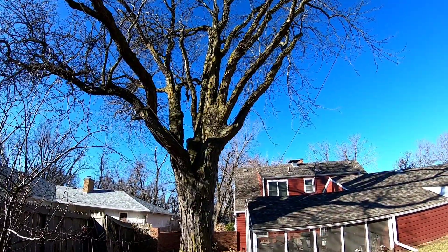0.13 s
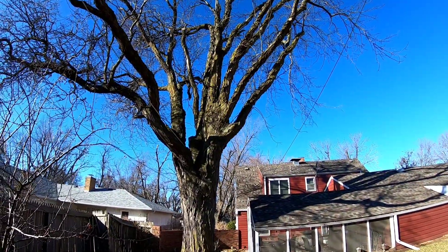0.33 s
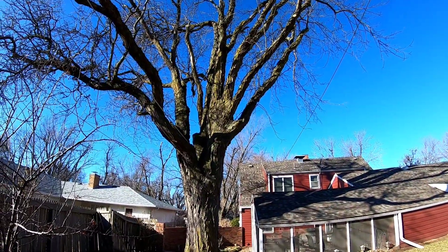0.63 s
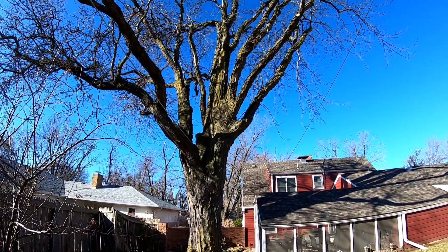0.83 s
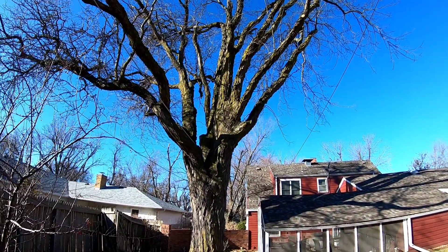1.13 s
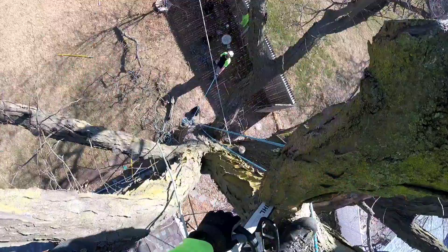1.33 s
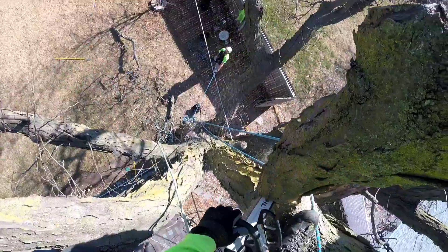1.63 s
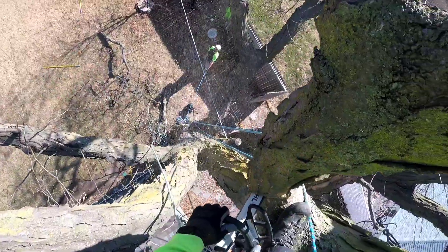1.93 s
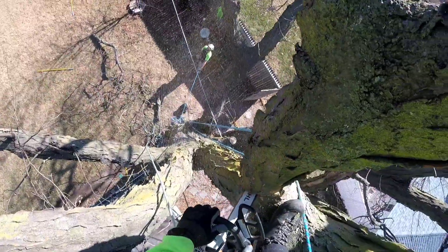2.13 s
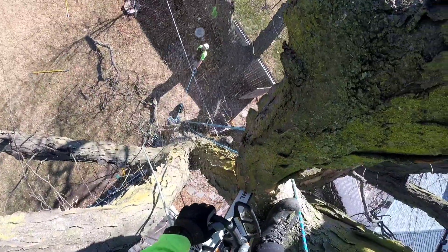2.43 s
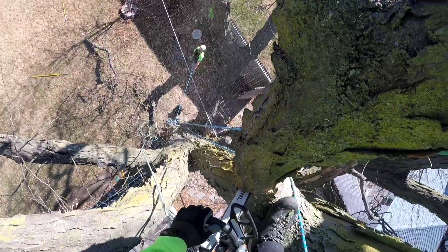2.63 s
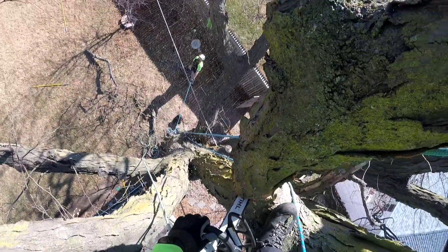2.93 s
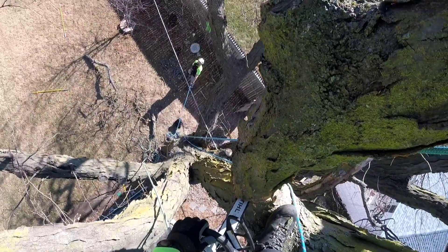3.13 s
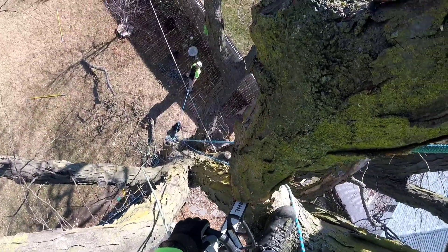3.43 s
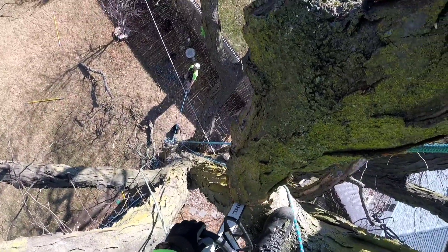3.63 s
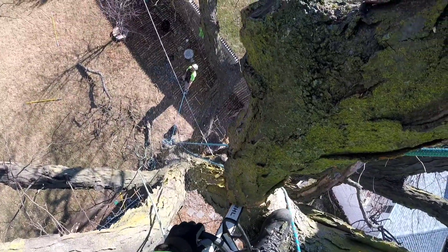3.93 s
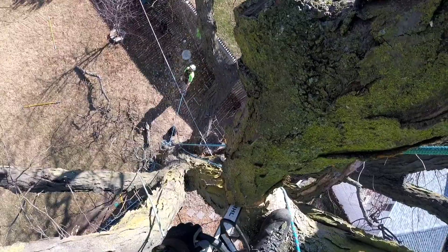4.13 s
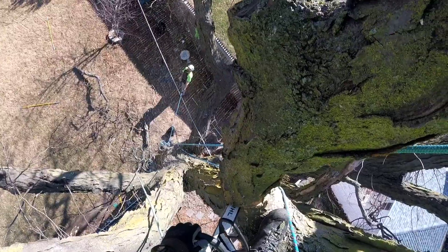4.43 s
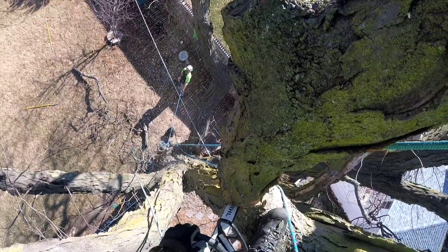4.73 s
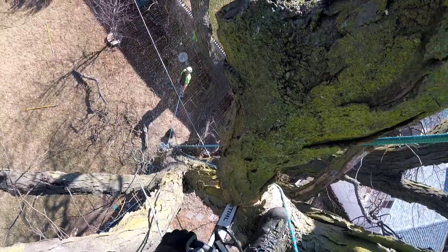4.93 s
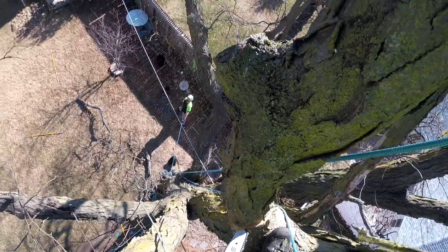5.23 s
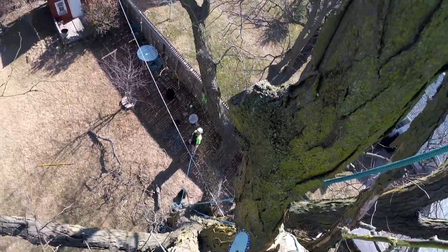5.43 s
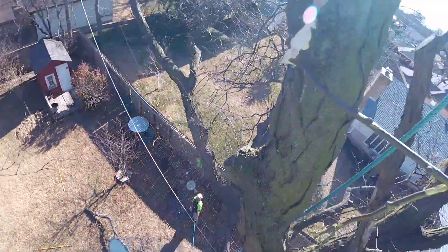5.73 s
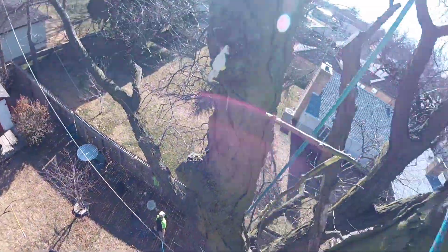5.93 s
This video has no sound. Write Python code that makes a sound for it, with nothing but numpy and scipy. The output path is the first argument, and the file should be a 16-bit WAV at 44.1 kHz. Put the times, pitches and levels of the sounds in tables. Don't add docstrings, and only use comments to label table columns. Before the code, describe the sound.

A hand rubs and snaps a camera button in a quiet yard, then a close chainsaw revs in bursts, idles lumpily and stops in wind.

```python
import sys
import numpy as np
from scipy import signal
from scipy.fft import rfft, irfft, next_fast_len
from scipy.io import wavfile
from scipy.ndimage import uniform_filter1d, map_coordinates

SR = 44100
rng = np.random.default_rng(int(sys.argv[2]) if len(sys.argv) > 2 else 0)


def volts_from_db(level):
    exponent = np.asarray(level, float) / 20
    return 10 ** exponent


def unload_audio(sound):
    columns = np.transpose(np.atleast_2d(sound))
    steps = np.round(np.clip(columns, -1, 1) * 32767)
    wavfile.write(sys.argv[1], SR, steps.astype(np.int16))


N = 267598
T = np.arange(N) / SR
CUT_S = 1.33


def unit(x):
    return x / np.sqrt(np.mean(x ** 2) + 1e-20)


def level(x, span_s=0.052):
    size = round(span_s * SR)
    power = uniform_filter1d(uniform_filter1d(x ** 2, size=size), size=size)
    return x / np.sqrt(np.abs(power) + 1e-12)


def curves(rows):
    s, *columns = np.transpose(rows)
    return [np.interp(T, s, column, -120, -120) for column in columns]


def lagged(x, lag_s):
    return uniform_filter1d(x, size=round(lag_s * SR))


def wobble(rate_hz):
    knots = rng.standard_normal(int(N * rate_hz / SR) + 4)
    return map_coordinates(knots, [np.arange(N) * rate_hz / SR])


def coloured(x, spectrum):
    m = next_fast_len(N + 8192) // 2 * 2
    hz, db = np.transpose(spectrum)
    curve_db = np.interp(np.log(np.fft.rfftfreq(m, 1 / SR) + 1), np.log(hz + 1), db)
    cepstrum = irfft(np.log(volts_from_db(curve_db) + 1e-6), m)
    cepstrum[1:m // 2] *= 2
    cepstrum[m // 2 + 1:] = 0
    return irfft(rfft(x, m) * np.exp(rfft(cepstrum)), m)[..., :N]


def resonant(x, hz, width_hz):
    return signal.lfilter(*signal.iirpeak(hz, hz / width_hz, SR), x)


def noise(spectrum, channels=1):
    return unit(coloured(rng.standard_normal((channels, N)), spectrum))


def puffs(impulses, decay_s):
    return signal.lfilter([1], [1, -np.exp(-1 / (decay_s * SR))], impulses)


def after(times_s, sizes, decay_s):
    marks = np.bincount(np.round(np.asarray(times_s) * SR).astype(int), sizes, N + SR)[:N]
    return puffs(marks, decay_s)


def beats(turns, offset, scatter_db, jitter):
    count = int(turns[-1])
    chance = rng.standard_normal((count, 2))

    def place(turn):
        return np.minimum(np.interp(turn, turns, np.arange(N) * 1.), N - 2)

    due = place(np.arange(count) + offset).astype(int)
    at = place(np.arange(count) + offset + (jitter * np.ones(N))[due] * chance[:, 0])
    size = volts_from_db((scatter_db * np.ones(N))[due] * chance[:, 1])
    whole = at.astype(int)
    part = at - whole
    return np.bincount(whole, size * (1 - part), N) + np.bincount(whole + 1, size * part, N)


# time in seconds, far traffic in dB, air in dB.
YARD_LEVELS = [
    (0.0, -53.5, -65),
    (0.138, -51, -68),
    (0.352, -51.5, -61),
    (0.51, -51, -58),
    (0.866, -50, -54.5),
    (0.996, -47.5, -49),
    (1.198, -52, -57.5),
    (1.32, -62, -83),
]
# frequency in Hz, level in dB per Hz.
TRAFFIC_SPECTRUM = [(18, -45), (30, -12), (62, -8.5), (113, -14), (194, -8), (327, -16), (405, -8.5),
                    (432, -14.5), (651, -17), (1500, -33), (1950, -53), (3300, -120)]
# frequency in Hz, level in dB per Hz.
AIR_SPECTRUM = [(590, -51), (1000, -6), (2090, -8.5), (2350, -13), (2630, -16), (2800, -17), (12000, -34),
                (15600, -71), (22000, -120)]


def yard():
    traffic_db, air_db = curves(YARD_LEVELS)
    traffic = noise(TRAFFIC_SPECTRUM) + .5 * noise(TRAFFIC_SPECTRUM, channels=2)
    air = noise(AIR_SPECTRUM, channels=2)
    return volts_from_db(traffic_db + .9 * wobble(9.1)) * traffic + volts_from_db(air_db + wobble(4.7)) * air


# start in seconds, pitch in Hz, length in seconds, level in dB.
BIRD_NOTES = [
    (.31, 2120, .03, -61),
    (.36, 2580, 0.13, -64),
    (.46, 2200, .06, -59),
    (0.534, 2140, 0.052, -58),
    (.6, 2100, .05, -63),
]


def bird():
    waver = np.cumsum(90 * wobble(60)) / SR
    song = np.zeros(N)
    for s, hz, length_s, db in BIRD_NOTES:
        swell = np.sin(np.pi * np.clip((T - s) / length_s, 0, 1))
        song += volts_from_db(db) * swell * np.sin(2 * np.pi * (hz * T + waver))
    return song


# time in seconds, level in dB, left minus right in dB.
SLIDE_LEVELS = [
    (0.8, -81, 0.5),
    (0.82, -34, -1),
    (0.898, -30, 1),
    (0.964, -50.5, -1),
    (1.0, -25, 0),
    (1.02, -21.5, -0.5),
    (1.046, -41.5, -3),
    (1.12, -70, 1.0),
]
# frequency in Hz, level in dB per Hz.
HOUSING_SPECTRUM = [(350, -42), (600, -23), (1020, -21), (1240, -9.5), (1590, -4.5), (1970, -17.5),
                    (3410, -11.5), (4080, -18), (5000, -9.5), (6230, -20.5), (8300, -13.5), (9140, -26),
                    (10100, -27), (11200, -45), (15800, -48)]


def hand_slide():
    db, pan_db = curves(SLIDE_LEVELS)
    rub = noise(HOUSING_SPECTRUM) + 1.7 * noise(HOUSING_SPECTRUM, channels=2)
    rub *= volts_from_db(db - 6.5 + wobble(150))
    rub += volts_from_db(db - 7) * unit(resonant(rng.standard_normal((2, N)), 1600, 110))
    return rub * volts_from_db(np.array([pan_db, -pan_db]) / 2 * (db > -100))


# frequency in Hz, level in dB per Hz.
BUFFET_SPECTRUM = [(15, -22), (28, 7.5), (50, 2.5), (65, 10.5), (200, -56), (600, -120)]
# frequency in Hz, level in dB per Hz.
FLUTTER_SPECTRUM = [(40, -3.5), (65, -3), (130, -1.5), (220, -13.5), (450, -32), (1500, -50.5),
                    (4000, -120)]


def buffeting(rows, sides, lumpy_db):
    buffet, flutter = (uniform_filter1d(volts_from_db(db), size=400) for db in curves(rows))
    low = volts_from_db(2.67 * lumpy_db * wobble(14)) * level(noise(BUFFET_SPECTRUM, channels=sides), 0.11)
    high = volts_from_db((1.5 + 1.5 * lumpy_db) * wobble(25)) * level(noise(FLUTTER_SPECTRUM, channels=sides))
    return buffet * low + flutter * high


# time in seconds, buffet in dB, flutter in dB.
SQUEEZE_LEVELS = [
    (0.8, -56, -54),
    (0.856, -41, -29.5),
    (0.976, -65, -41.5),
    (1.028, -18, -28),
    (1.07, -36, -40.5),
    (1.186, -28, -23.5),
    (1.224, -34, -65),
    (1.25, -26, -19),
]


def hand_pressure():
    return buffeting(SQUEEZE_LEVELS, sides=2, lumpy_db=0)


# time in seconds, peak in dB, ring in Hz, push minus peak in dB, snap share 0-1.
BUTTON_HITS = [
    (1.179, -34, 1560, 2, 0.35),
    (1.2420, -31, 3500, -4, 0.83),
    (1.253, -28, 3280, 11, 0.9),
    (1.2628, 3.5, 1400, -5, 0.93),
    (1.3140, -21, 1750, -3, 0.34),
]


def button():
    out = np.zeros((2, N))
    t = np.arange(SR // 20) / SR
    for s, db, hz, push_db, snap in BUTTON_HITS:
        ring = (1 - snap) * volts_from_db(-60 * t / .009) * np.sin(2 * np.pi * hz * t)
        kick = np.exp(-t / 0.00074) * np.cos(2 * np.pi * 900 * t) * [[1], [-1]]
        crack = 0.26 * volts_from_db(-60 * t / 0.0059) * rng.standard_normal((2, len(t)))
        lag_rad = np.array([[0], [1.7]])
        push = np.sin(2 * np.pi * 78 * t - lag_rad) * np.exp(-t / 0.0067) * (1 - np.exp(-t / 0.00044))
        start = round(s * SR)
        out[:, start:start + len(t)] += volts_from_db(db) * (ring + snap * (kick + crack) + volts_from_db(push_db) * push)
    return out


def treetop_air():
    return (T > CUT_S) * volts_from_db(-70) * noise(AIR_SPECTRUM, channels=2)


# time in seconds, shaft speed then in Hz, throttle 0-1 from then on,
# settling time of the speed in seconds, muffler toward the microphone in dB.
TRIGGER_MOVES = [(1.329, 83.3, 0.94, 0.31, 1), (1.9, 171.5, 0.36, 4.96, 0.5),
                 (2.08, 123.6, 0.95, 0.32, 1.5), (2.237, 158.4, 0.15, 1.57, 0), (2.41, 89.6, 0.89, 0.35, 0),
                 (2.527, 132, 0.12, 0.38, -0.5), (2.95, 38.8, 0.32, 1.4, -1), (3.11, 40, 0.88, 0.072, 0),
                 (3.27, 98.4, 0.31, .3, 1), (3.42, 69.2, 0.91, 1.57, 0.5), (3.67, 124.4, 0.09, .17, 2),
                 (3.95, 54.2, 0.91, 0.21, 0), (4.175, 120, 0.42, .15, 1), (4.45, 89.8, 0.98, .6, -0.5),
                 (4.599, 132.4, 0.08, 0.32, 1.5), (4.97, 43, 0.13, 1.59, 0.5), (5.24, 39, 0.11, 1.3, 4),
                 (5.539, 40, 0.01, 0.12, 6), (6.07, 9.1, 0, 1.5, 2)]
# shaft speed in Hz, thump in dB, exhaust in dB.
SHUT_LEVELS = [(9, -73, -62), (14.2, -52, -41), (23.25, -45, -31), (40, -39, -24.5), (55, -44, -23),
               (74.92, -34, -22), (108, -20.5, -18.5), (168, -18, -16.5)]
# shaft speed in Hz, thump in dB, exhaust in dB.
OPEN_LEVELS = [(42, -11, -17), (71.4, -17, -12.5), (85.5, -15.5, -12), (123, -11.5, -15),
               (164, -10.5, -18.5)]
# shaft speed in Hz, rattle in dB, muffler buzz in dB.
METAL_LEVELS = [(9, -64, -62.5), (23.8, -47, -36.5), (40.42, -37, -35), (54.5, -38, -34),
                (76.08, -26.5, -24), (102, -25, -24.5), (170, -22, -21)]
CARBURETTOR_S, FLYWHEEL_S = 0.026, 0.029
GULP_DB, GULP_S = -4, 0.08
LOADED_DB = -0.5
KICK_HZ, KICK_DB, KICK_S = 9, 1, .06
SMOOTH, LEAN, CATCH, CATCH_S, LUMPY = .03, .8, .3, .03, .55


def controls():
    s, hz, throttle, settle_s, facing_db = np.transpose(TRIGGER_MOVES)
    move = np.clip(np.searchsorted(s, T) - 1, 0, len(s) - 2)
    done = np.expm1(-np.maximum(T - s[move], 0) / settle_s[move])
    done = done / np.expm1(-np.diff(s)[move] / settle_s[move])
    coasting = lagged(hz[move] + np.diff(hz)[move] * done, FLYWHEEL_S)
    kick = after([pop[0] for pop in STRAY_FIRINGS], None, KICK_S)
    kick = kick * np.clip((50 - coasting) / 5, 0, 1) * (throttle[move] > 0)
    speed_hz = coasting + KICK_HZ * lagged(kick, FLYWHEEL_S)

    def at_speed(rows):
        knots_hz, *columns = np.transpose(rows)
        return [np.interp(speed_hz, knots_hz, db) for db in columns]

    charge = np.clip(lagged(throttle[move], CARBURETTOR_S), 0, 1)
    levels = zip(at_speed(SHUT_LEVELS), at_speed(OPEN_LEVELS))
    thump_db, pipe_db = (shut + charge * (full - shut) for shut, full in levels)
    change = np.diff(throttle, prepend=throttle[0])
    gulp_db = GULP_DB * after(s, np.maximum(-change, 0), GULP_S)
    pipe_db += lagged(facing_db[move] + gulp_db, CARBURETTOR_S)
    rattle_db, buzz_db = (db + LOADED_DB * charge + KICK_DB * kick for db in at_speed(METAL_LEVELS))
    part = np.clip(throttle[move], 0, 1)
    rough = SMOOTH + LEAN * 4 * part * (1 - part) + CATCH * after(s, np.maximum(change, 0), CATCH_S)
    rough = lagged(np.maximum(rough, LUMPY * np.clip((55 - speed_hz) / 12, 0, 1)), FLYWHEEL_S)
    return speed_hz, thump_db, pipe_db, rattle_db, buzz_db, rough


# frequency in Hz, level in dB per Hz.
FIRED_SPECTRUM = [(120, -30.5), (200, -0.5), (320, 3.5), (435, -3), (560, 2), (700, 2), (860, -1),
                  (980, -20.5), (1300, -13), (1900, -10.5), (3000, -32), (6600, -120)]
# frequency in Hz, level in dB per Hz.
IDLE_SPECTRUM = [(60, -13.5), (150, -2), (250, 1.5), (350, 3.5), (440, -6.5), (600, -20.5), (820, -19),
                 (1050, -19.5), (1300, -46), (2000, -75)]
# frequency in Hz, level in dB per Hz.
COAST_SPECTRUM = [(60, -44.5), (110, 1.5), (200, -1.5), (330, 0), (450, -3.5), (700, 0), (850, -1),
                  (980, -31), (1500, -67), (2600, -120)]


def exhaust(pulse, speed_hz, fire, rough):
    idle = coloured(-pulse, IDLE_SPECTRUM)
    idle = idle + .5 * np.roll(idle, round(.0065 * SR))
    flow = np.clip((speed_hz - 42) / 40, 0, 1)
    pumped = flow * level(coloured(-pulse, COAST_SPECTRUM)) + (1 - flow) * level(idle)
    jet = level(coloured(rng.standard_normal(N) * (0.68 + puffs(pulse, 0.023)), COAST_SPECTRUM))
    blast = level(coloured(-pulse, FIRED_SPECTRUM))
    chamber = resonant(np.roll(blast, round(0.00244 * SR)), 642, 110)
    blast = level(blast + volts_from_db(-3) * level(chamber))
    return level(fire * blast + (1 - fire) * pumped + (.07 + .38 * rough) * jet)


def crank_thump(turns):
    crank_rad = 2 * np.pi * (turns + .35)
    shake = np.sin(crank_rad) + .17 * np.cos(2 * crank_rad + 2.6)
    return np.sqrt(2) * shake * volts_from_db(.8 * wobble(30))


# frequency in Hz, level in dB per Hz.
SHELL_SPECTRUM = [(600, -68), (900, -1), (1100, 0), (1300, -2), (1820, 2.5), (2500, 0), (3200, -9.5),
                  (4200, -10.5), (7000, -120)]


def muffler_buzz(pulse, fire, rough):
    gas = rng.standard_normal(N) * (0.54 + puffs(pulse, 0.016))
    rasp = level(coloured(gas, SHELL_SPECTRUM)) * volts_from_db(2.2 * wobble(25))
    struck = level(coloured(-pulse, SHELL_SPECTRUM))
    return level(rasp + 1.1 * (1 - rough) * fire ** 2 * struck)


# centre in Hz, width in Hz, place in the turn 0-1, level in dB.
PISTON_SLAPS = [(5120, 1070, 0.6, 5.5), (7250, 5300, 0.97, -2.5), (2520, 530, 0.5, 2)]
# frequency in Hz, gain in dB.
PORT_RESPONSE = [(9500, 0.5), (10800, -5), (12200, -33), (13800, -14), (15000, -32), (16000, -68)]


def piston_slaps(turns):
    slaps = np.zeros(N)
    for hz, width_hz, turn, db in PISTON_SLAPS:
        hits = puffs(beats(turns, turn, scatter_db=2.8, jitter=.03), .003)
        slaps += volts_from_db(db) * unit(resonant(rng.standard_normal(N) * hits, hz, width_hz))
    return level(coloured(slaps, PORT_RESPONSE), 0.45)


# frequency in Hz, level in dB per Hz.
CHAIN_SPECTRUM = [(1760, -48), (3000, -3.5), (3830, -2.5), (4190, -8.5), (4850, 0), (5570, 1), (6100, -5),
                  (6540, -1), (7990, -8), (8810, -7.5), (10600, -13), (12200, -37), (13900, -26.5),
                  (14900, -56), (15800, -65)]


def chain():
    return noise(CHAIN_SPECTRUM)[0] * volts_from_db(1.85 * wobble(300) + wobble(6.8))


# frequency in Hz, width in Hz, level in dB.
CASE_MODES = [(1800, 32, -1), (2470, 180, -7.5), (3904, 25, -6), (5530, 320, -0.5), (6270, 72, -3.5)]


def crankcase():
    return sum(volts_from_db(db) * unit(resonant(rng.standard_normal(N), hz, width_hz))
               for hz, width_hz, db in CASE_MODES)


# multiple of shaft speed, level in dB.
WHINE_ORDERS = [(6, -9), (7, -4), (8, -11), (9, -9), (10, -7), (11, -8), (12, -3), (13, -11), (14, -7),
                (16, -11)]


def whine(turns, speed_hz):
    lines = sum(volts_from_db(db + 3.5 * wobble(6.88)) * np.sin(2 * np.pi * order * turns + order ** 2)
                for order, db in WHINE_ORDERS)
    return lines * np.clip((speed_hz - 60) / 55, 0, 1)


# frequency in Hz, level in dB per Hz.
SIDE_HISS_SPECTRUM = [(1760, -103), (3000, -76), (3990, -57), (4460, -9), (6630, -24), (10100, -3),
                      (13900, -3.5), (15800, -38)]


def engine():
    speed_hz, thump_db, pipe_db, rattle_db, buzz_db, rough = controls()
    turns = np.cumsum(speed_hz * (np.arange(N) > CUT_S * SR)) / SR
    fire = np.clip((thump_db - pipe_db + 8.5) / 11, 0, 1)
    clutch = np.clip((speed_hz - 48) / 20, 0, 1)
    pulse = beats(turns, .2, scatter_db=.8 + 3 * rough, jitter=.003 + .035 * rough)
    rattle = (0.24 + 0.53 * clutch) * chain() + (.8 - 0.45 * clutch) * piston_slaps(turns)
    saw = volts_from_db(pipe_db) * exhaust(pulse, speed_hz, fire, rough)
    saw += volts_from_db(thump_db) * crank_thump(turns)
    saw += volts_from_db(rattle_db) * level(rattle)
    saw += volts_from_db(buzz_db) * muffler_buzz(pulse, fire, rough)
    saw += volts_from_db(rattle_db - 12) * crankcase()
    saw += volts_from_db(rattle_db - 2) * (1 - rough) * whine(turns, speed_hz)
    side_hiss = volts_from_db(rattle_db - 30) * noise(SIDE_HISS_SPECTRUM) * [[1], [-1]]
    return (saw + side_hiss) * np.clip((T - CUT_S) / 0.021, 0, 1)


def frame_shake():
    jolts = uniform_filter1d(after([row[0] for row in TRIGGER_MOVES], None, .04), size=1500)
    held = (T > CUT_S) & (T < BREEZE_LEVELS[0][0])
    shake_db = -37 + 9 * jolts + 2.4 * wobble(12)
    return held * volts_from_db(shake_db) * level(noise(BUFFET_SPECTRUM), 0.21)


# time in seconds, peak in dB, crack minus peak in dB.
STRAY_FIRINGS = [(2.965, -14.5, -20), (3.019, -7.5, -6.5), (3.116, -6, -6), (3.152, -14, -21),
                 (4.959, -7.5, -26), (4.985, -10, -33.5), (5.035, -6, -4.5), (5.146, -12, -1.5),
                 (5.171, -6, -21), (5.31, -11, -2.5), (5.416, -7, -4), (5.675, -12.5, -16),
                 (5.72, -7.5, -38)]


def pops():
    bark, crack = np.zeros(N), np.zeros(N)
    for s, db, crack_db in STRAY_FIRINGS:
        bark[round(s * SR)] = volts_from_db(db)
        crack[round(s * SR)] = volts_from_db(db + crack_db)
    clatter = noise(CHAIN_SPECTRUM)[0] + 2.14 * noise(SHELL_SPECTRUM)[0] + 2.2 * noise(COAST_SPECTRUM)[0]
    shake = puffs(puffs(crack, 0.0098), 0.0012) / 45 * clatter
    return volts_from_db(33) * resonant(resonant(bark, 520, 320), 450, 400) + volts_from_db(-16) * shake


# time in seconds, buffet in dB, flutter in dB.
BREEZE_LEVELS = [
    (4.9, -27, -29),
    (4.944, -41, -35),
    (5.14, -41, -29),
    (5.24, -21, -29),
    (5.512, -19, -24),
    (5.672, -17.5, -13),
    (5.918, -15.5, -18),
    (6.01, -18, -17),
    (6.068, -19, -26),
]


def wind():
    return buffeting(BREEZE_LEVELS, sides=1, lumpy_db=1)


# time in seconds, peak in dB, centre in Hz.
SETTLING_TICKS = [(5.584, -30.5, 6510), (5.605, -43, 7026), (5.652, -34, 6510), (5.705, -40, 7000),
                  (5.711, -20, 900), (5.719, -17, 420), (5.727, -22, 700), (5.757, -57, 6040),
                  (5.818, -29.5, 1800), (5.849, -37, 2000), (5.918, -60, 4003), (6.001, -54, 6940)]


def ticks():
    out, t = np.zeros(N + SR), np.arange(SR // 40) / SR
    for s, db, hz in SETTLING_TICKS:
        puff = resonant(rng.standard_normal(len(t)) * np.exp(-t / 0.0064), hz, 0.23 * hz)
        out[round(s * SR):][:len(t)] += volts_from_db(db + 6.5) * puff
    return coloured(out[:N], PORT_RESPONSE)


def scene():
    before = yard() + bird() + hand_slide() + hand_pressure() + button()
    treetop = treetop_air() + engine() + frame_shake() + pops() + wind() + ticks()
    return before + treetop


def low_pass(x):
    return signal.sosfilt(signal.butter(12, 15800, fs=SR, output="sos"), x)


def record(dry):
    limited = dry / (1 + np.abs(dry / .98) ** 5) ** (1 / 5)
    return low_pass(limited)


dry = scene()
out = record(dry)
unload_audio(out)
```